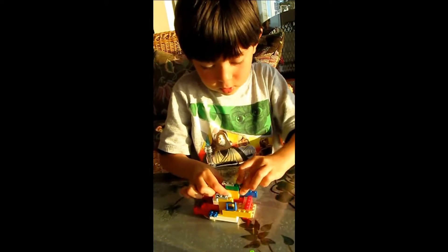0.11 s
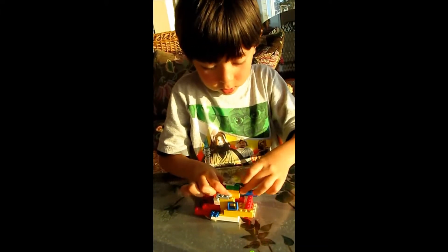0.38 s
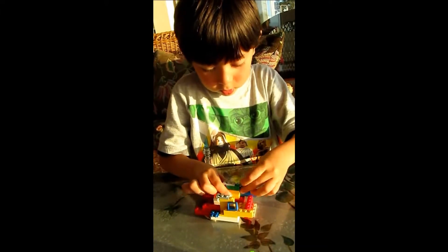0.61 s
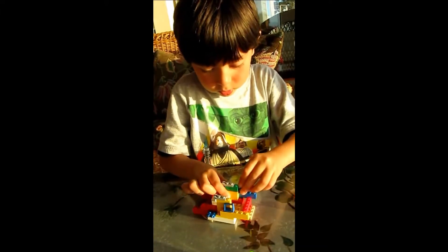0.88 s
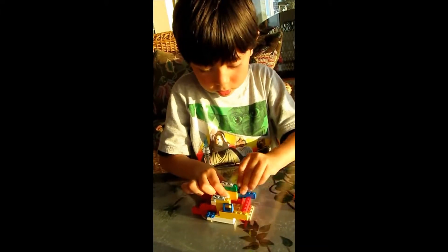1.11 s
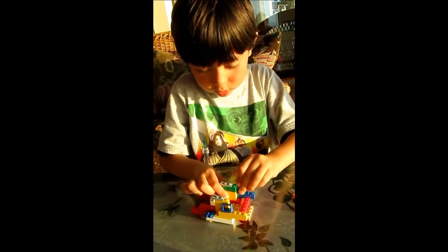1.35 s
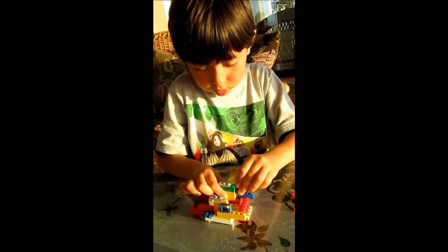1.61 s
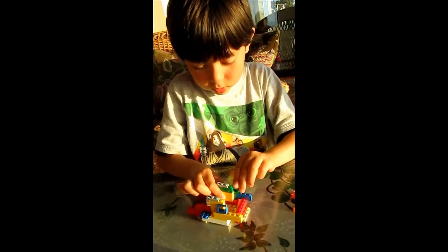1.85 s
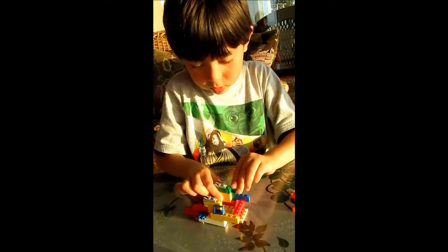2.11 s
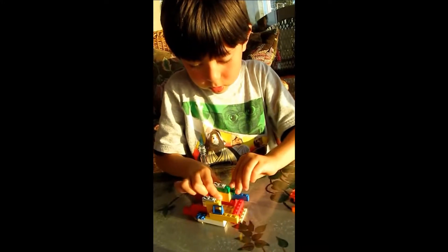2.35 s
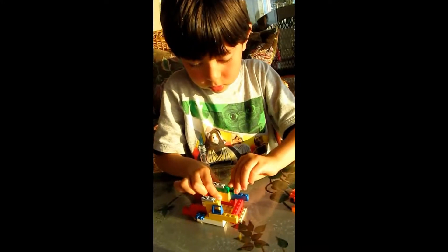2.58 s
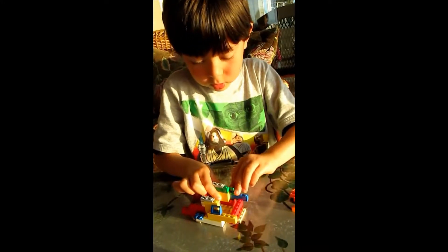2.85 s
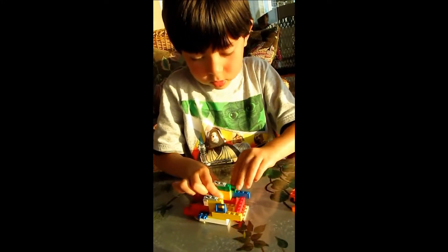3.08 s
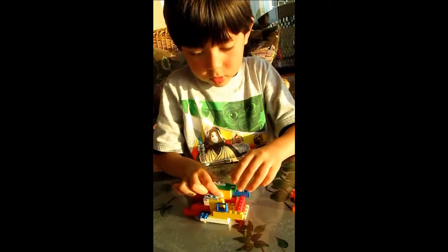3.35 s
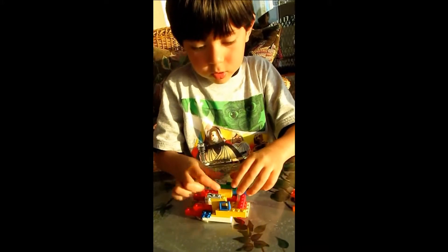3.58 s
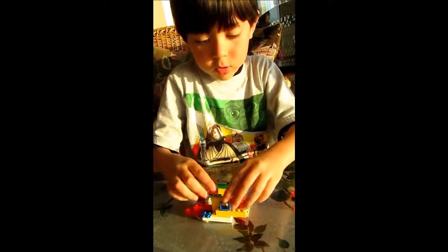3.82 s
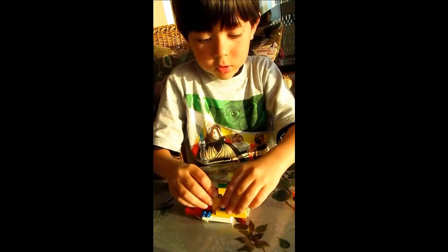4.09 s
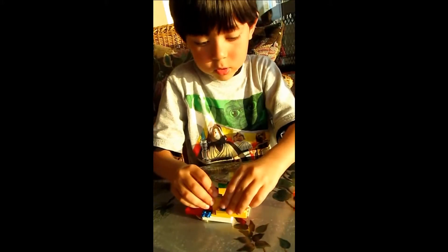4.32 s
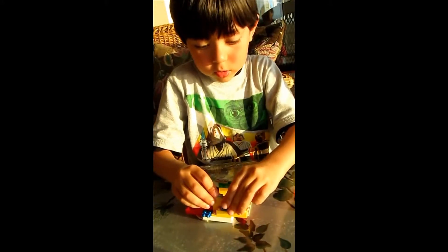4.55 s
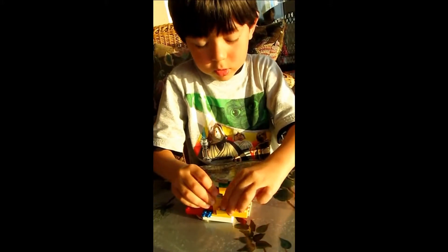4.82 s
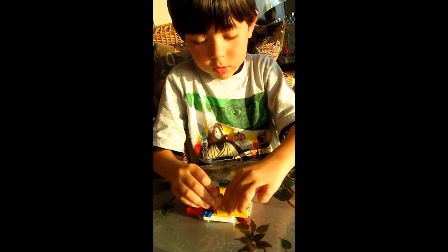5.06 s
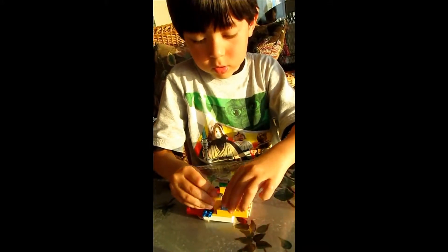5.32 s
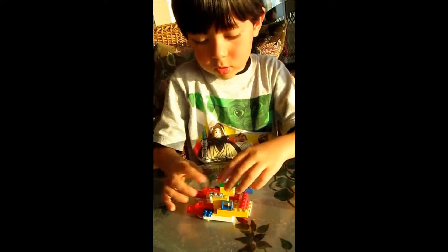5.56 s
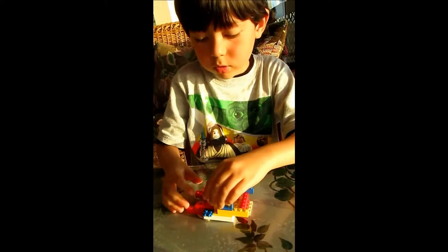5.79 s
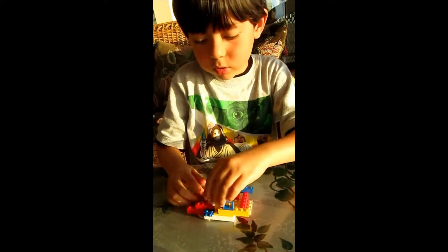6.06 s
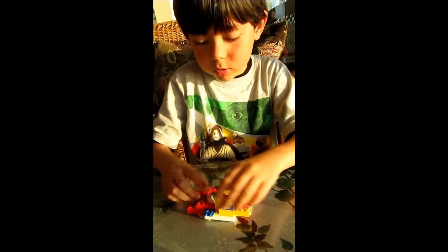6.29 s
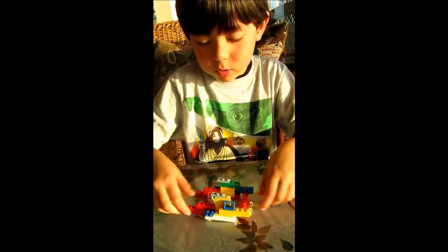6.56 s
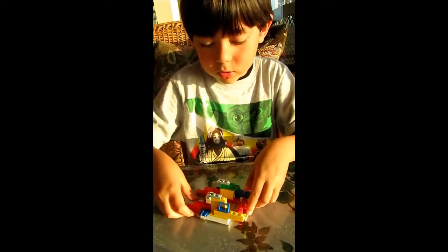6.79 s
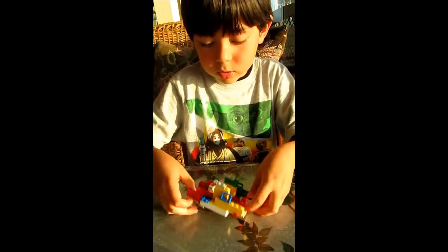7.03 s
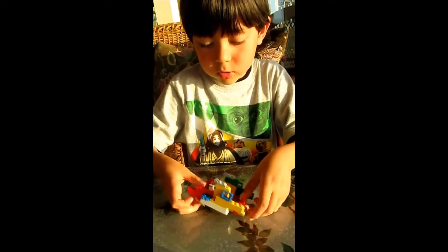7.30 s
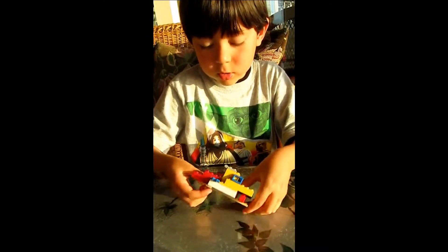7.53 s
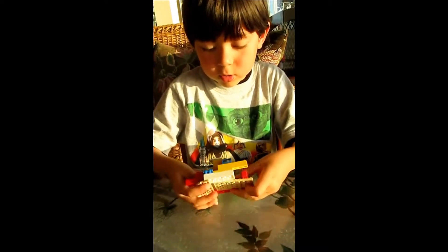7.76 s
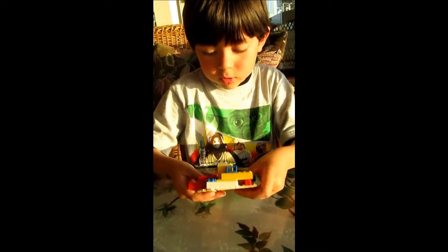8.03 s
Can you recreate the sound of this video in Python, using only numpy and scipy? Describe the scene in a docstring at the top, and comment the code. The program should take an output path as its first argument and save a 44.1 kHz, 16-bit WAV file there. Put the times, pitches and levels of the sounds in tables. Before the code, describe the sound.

Plastic toy bricks are tapped and shuffled on a hard table, one snaps loudly, then the model is knocked about in a quiet room.

```python
"""Quiet room noise and a faint scrape come first, then toy bricks tapped and shifted on a hard table.
Place: a small furnished room. Distance: direct sound above the short room tail, leaning slightly left.
Contacts and dragging ring six bodies, from table top to brick studs, as decaying modes; one snaps loudly.
Low pushes come through the furniture; the noise is shaped bands of stereo hiss.
Microphone: a stereo pair whose gain control ducks the room noise and lets it creep back."""
import sys
import numpy as np
from scipy import signal
from scipy.io import wavfile
from scipy.ndimage import uniform_filter1d

SR = 44100
rng = np.random.default_rng(int(sys.argv[2]) if len(sys.argv) > 2 else 0)


def nominal_scale(level):
    """Amplitude ratio for a level in decibels (scalar or array-like)."""
    x = np.asarray(level, float) / 20
    return 10 ** x


def output_pcm(signal):
    """Save a mono or channel-first signal as 16-bit PCM at the path in sys.argv[1].

    Samples are clipped to [-1, 1] before scaling.
    """
    pcm = np.clip(np.atleast_2d(signal).T, -1, 1) * 32767
    wavfile.write(sys.argv[1], SR, np.round(pcm).astype(np.int16))


N = 359407

# Room noise spectrum. Each row: frequency in Hz, relative density in dB per Hz.
ROOM_NOISE = [(18, -48.5), (30, -17.5), (75, -14), (196, 1), (432, -9), (2690, -20.5), (3530, -21),
              (3990, -38.5), (4410, -23.5), (5370, -25), (7230, -28.5), (8380, -43), (11000, -65.5),
              (14300, -92), (22000, -120)]
# Left-right likeness of the room noise. Each row: frequency in Hz, correlation (1 = same, -1 = opposite).
LIKENESS = [(60, -0.41), (220, -0.61), (820, -0.47), (3030, 0.089), (11200, -0.012)]
# Heavier pushes that reach the microphone through the furniture.
# Each row: start in seconds, level in dB (the push peaks about 11 dB above it).
THUMPS = [(1.577, -52), (2.9495, -43), (6.777, -57), (6.8, -51.5), (7.265, -53), (7.47, -54)]
# Modes of the six bodies. Each row: frequency in Hz, relative level in dB, 60 dB decay time in seconds.
TABLE_TOP = [(111, -31.5, 0.036), (149.7, 1, 0.11), (188, -8, 0.31), (258, 5.5, 0.076), (306.8, -7, 0.39),
             (367, 3, 0.049)]
STACK = [(407, -17, 0.0056), (580, 0, 0.02), (654, -6.5, 0.044), (765, -7.5, 0.024)]
HOLLOWS = [(820, -23.5, 0.0041), (977, 3, 0.021), (990, 4.5, 0.0023), (1084, -1, 0.015), (1165, 2, 0.02),
           (1304, 3, 0.015), (1408, -6, 0.015)]
SIDES = [(1410, -15.5, 0.0088), (1407, -3.5, 0.012), (1583, -1.5, 0.011), (1850, -2, 0.0097),
         (2107, 3.5, 0.004), (2003, -4, 0.014)]
WALLS = [(2320, -14, 0.003), (2350, -3.5, 0.011), (2650, -2, .012), (3104, 0.5, 0.0098), (3296, 0, 0.008),
         (3670, -1.5, 0.0073), (3660, -5.5, 0.014), (4300, -1, 0.0036)]
STUDS = [(4800, 11.5, 0.00047), (5100, 1, 0.0043), (6360, -2.5, 0.0009), (7010, 5.5, 0.0016),
         (7940, -10.5, 0.011), (8800, -5, 0.0038), (10260, -18.5, 0.0068)]
# Hands and model dragging on the table.
# Each row: time in seconds, level in dB, brick scrape in dB relative to that level.
DRAG = [(0, -52.5, -11), (0.45, -76, -10), (0.8, -53.5, -10.5), (1.4, -61.5, -25), (2.05, -53.5, -28),
        (2.649, -66.5, -4), (3.15, -53, -10), (3.45, -84.5, -32), (3.7, -55, -8), (4.199, -52, -12.5),
        (4.7, -67, -23), (5.4, -67, -13), (5.62, -49.5, -11.5), (5.801, -56, -6), (5.92, -48, -17),
        (6.15, -59, -10), (6.6, -58.5, -7), (7.0, -56.5, -13), (7.25, -45.5, -15), (7.419, -49.5, -6),
        (7.8, -59.5, 0.5), (7.998, -56, -7.5)]
# Short taps. Each row: start in seconds, then nominal levels in dB of table top, stacked model,
# brick hollows, thin walls, stud tick.
TAPS = [(0.392, -46, -48, -50, -58, -75), (0.43, -44.5, -82, -85, -84, -54),
        (0.634, -38, -50, -49, -53, -53), (0.6473, -58, -57, -49, -50, -73),
        (0.671, -46.5, -50, -51.5, -58, -81), (0.756, -59, -60, -57, -51.5, -73),
        (0.778, -40, -43, -40, -46, -48), (1.286, -38.5, -48, -51.5, -56.5, -51),
        (1.584, -38, -43, -46, -53.5, -61), (1.736, -52, -54, -50, -65, -85),
        (1.756, -42.5, -47, -55, -61, -49.5), (2.3993, -48, -60, -71, -74.0, -61.5),
        (2.664, -50, -54.5, -58.5, -72, -66), (2.8725, -47.5, -56, -45.5, -53.5, -59.5),
        (3.635, -45, -52.5, -61, -70.5, -76), (3.7205, -43, -47, -56.5, -79.5, -66),
        (3.859, -74, -51, -51, -47.5, -49.5), (4.1007, -34.5, -32, -41.5, -57, -82),
        (4.165, -47, -58, -60, -53, -52.5), (4.178, -53, -67, -62, -54, -66),
        (4.9636, -45, -41, -48.5, -73, -89.5), (5.472, -48.5, -53, -64.5, -65, -68),
        (5.664, -31.5, -29, -44, -54, -51), (5.671, -36, -51, -39, -53, -56),
        (5.682, -38, -41, -45, -61, -54), (5.697, -46, -42, -49.5, -62, -58),
        (5.718, -55, -56, -64, -68, -59), (5.856, -45.5, -61, -61, -71, -64.5),
        (5.8898, -41, -66.0, -80, -74, -61.5), (5.905, -42, -43.5, -58.5, -69, -71),
        (5.9194, -36, -35.5, -44, -69, -63), (5.9775, -36, -43, -45.5, -60.5, -61),
        (6.091, -39.5, -44, -58, -62, -68), (6.211, -41.5, -53.0, -57, -68, -68),
        (6.357, -44.5, -56, -69.5, -62, -55), (6.736, -37, -48, -55, -61, -68.5),
        (6.776, -28.5, -32, -43, -46, -44), (6.789, -29, -44, -31.5, -44, -47),
        (6.803, -30, -37, -35, -43, -40), (6.809, -35, -36, -32.5, -43, -46),
        (6.8148, -30, -43, -29, -47, -55), (6.822, -47, -34, -43, -57, -71),
        (6.832, -46, -34, -45, -51, -72), (6.848, -55, -43, -54, -56, -72),
        (6.9291, -43, -56, -54, -70, -63), (6.942, -37, -38.5, -51.5, -54.5, -69),
        (7.156, -39.5, -58, -83, -67, -74), (7.2, -43, -47, -61, -58, -59),
        (7.239, -41, -44.5, -54, -50, -59), (7.2945, -26, -29, -36.5, -38, -51),
        (7.305, -36.5, -38, -33, -43, -59), (7.318, -50, -44, -35, -44, -59),
        (7.334, -36, -49, -44, -50, -55), (7.35, -38, -45, -40, -59, -70), (7.364, -51, -51, -52, -52, -66),
        (7.476, -26.5, -24, -33.5, -47, -42), (7.637, -42.5, -43, -55, -50.5, -51),
        (7.762, -74, -52, -46, -47, -53.5)]
# Shoves that rattle on longer. Each row: start in seconds, then nominal levels in dB of table top,
# stacked model, brick hollows, thin walls, stud tick, then rattle length in seconds.
SHOVES = [(0.205,-55,-48,-48,-48,-47,0.0058), (0.887,-56,-42,-49,-44.5,-88,0.0082),
          (0.949,-41.5,-61,-54,-57,-88,0.026), (1.999,-44.5,-56,-72,-88,-90,0.021),
          (2.044,-45.5,-62,-55.5,-66,-60,0.027), (4.0677,-31,-36,-47,-49.5,-53,0.018),
          (5.647,-29.5,-45,-47,-58,-58,0.02), (5.784,-53,-48.5,-51,-56.5,-57,0.045),
          (7.224,-33,-40,-63,-61,-62,0.016), (7.262,-46,-50,-46,-58,-56,0.006),
          (7.268,-37.5,-32,-24,-38,-39.5,0.02), (7.273,-24,-23,-38.5,-31,-28.5,0.015),
          (7.284,-36,-28,-29,-33,-31.5,0.01), (7.887,-63,-45,-46,-44.5,-38.5,0.05),
          (8.136,-76,-50,-55,-44,-46,0.005)]
# Clean hard contacts, the loudest a brick snapping home. Each row: start in seconds, then nominal levels
# in dB of table top, stacked model, brick hollows, long sides, thin walls, stud tick.
SNAPS = [(0.2055,-54,-56,-43.5,-60,-50,-47), (0.633,-47,-50,-42,-64,-57,-59),
         (0.7736,-37.5,-40.5,-36,-55,-41,-43), (0.7846,-52,-43,-44,-60,-39.5,-60),
         (1.5783,-41,-37.5,-39,-51,-46,-48), (1.7335,-62,-47,-45,-61,-54.5,-75),
         (0.8868,-41.5,-50,-41,-59,-54,-87), (1.755,-48,-63,-48.5,-53,-66,-60),
         (2.9513,-28,-20.5,-17,-16,-21.5,-31.5), (4.064,-35.5,-52,-44.5,-68,-67,-64.5),
         (4.9629,-54.5,-49,-49,-56,-66.5,-85.5), (6.7748,-30,-46,-60.5,-42.5,-49.5,-51),
         (6.7889,-37,-33,-34.5,-49,-55,-56), (6.816,-38,-33.5,-42,-36,-44,-59),
         (7.2702,-21.5,-26,-25.5,-30,-44,-55), (7.288,-23,-23,-28.5,-35,-29.5,-33),
         (7.4717,-28,-30,-33.5,-40.5,-49,-44), (8.137,-78,-63,-58,-48,-66,-34.5)]
# The next three hold one value each for table, stack, hollows, sides, walls, studs.
# How far heavy bodies start to move before the plastic cracks. Each entry: lead in seconds.
LEAD_S = [0.003, 0.0018, 0.0011, 0.00055, 0.00024, 0.00013]
# Stereo place of the direct sound. Each entry: left over right in dB.
LEFT_LEAN_DB = [0.5, 1.2, 1.1, 1.2, 1.3, .3]
# How well each body radiates into the room. Each entry: send in dB.
ROOM_SEND_DB = [-5.5, -5, -5, -2.5, -6.5, 1.5]

ROOM_NOISE_DB = -53.5   # rms of the two channels' mean, ahead of the gain control
ROOM_T60_S, WALL_CUT_HZ, ROOM_DB, ROOM_WIDTH = 0.38, 2200, -7.5, 0.3   # decay time is that of the lows
# In taps and shoves the long sides ring at a level between hollows and walls, plus an offset.
SIDES_TOWARD_WALLS, TAP_SIDES_DB, SHOVE_SIDES_DB = 0.22, -8, -1.5
TAP_RATTLE_S, SNAP_RATTLE_S = 0.007, 0.0005
CREEP_SHARE = 0.69   # time scale of the knocks before a contact, relative to those after
CLEAN_S = 0.0044   # rattle length holding half the energy
# Unevenness of the knocks, fade per rattle length, likeness between bodies.
SLIP_SPREAD_DB, SLIP_FADE_DB, SLIPS_SHARED = 3.5, 5.5, 0.6
EDGE_ECHO_S, EDGE_ECHO_DB, THUMP_LEAN_DB = 0.0012, -15.5, 4.0   # lean: left over right
DUCK_ABOVE_DB, DUCK_DB_PER_DB, DUCK_ATTACK_S, DUCK_RELEASE_DB_S = -18, 1.6522, 0.14, 3


def rms_one(x):
    """Scale to rms 1."""
    return x / np.sqrt(np.mean(x ** 2) + 1e-20)


def at_hz(points, hz):
    """Read a table on a log-frequency axis."""
    table_hz, values = np.transpose(points)
    return np.interp(np.log(hz), np.log(table_hz), values)


def drift(corner_hz):
    """Slow chance with spread 1: noise through two equal low-pass poles, at one fortieth of the rate."""
    r = np.exp(-2 * np.pi * corner_hz * 40 / SR)
    white = rng.standard_normal(N // 40 + 2002)
    slow = signal.lfilter([1], [1, -2 * r, r * r], white)[2000:]   # drop the filter's run-in
    return np.interp(np.arange(N) / 40, np.arange(len(slow)), rms_one(slow))


def room_noise(flicker_db=2.0):
    """Third-octave bands of wide stereo noise, each with a slight flicker of its own."""
    out, edges = 0, 25 * 2 ** np.arange(0, 9, 1 / 3)
    white = rng.standard_normal((2, 2, N))
    for k, (low, high) in enumerate(zip(edges, edges[1:])):
        band = signal.butter(2, [low, high], "band", fs=SR, output="sos")
        mid, side = signal.sosfilt(band, white[k % 2])   # neighbouring bands use separate noise
        hz = np.sqrt(low * high)
        alike = np.clip(at_hz(LIKENESS, hz), -.95, .95)
        width = np.sqrt((1 - alike) / (1 + alike))
        gain = nominal_scale(at_hz(ROOM_NOISE, hz) + flicker_db * drift(28))
        out = out + gain * (mid + width * side * [[1], [-1]])
    # nothing steady in the top octave
    out = signal.sosfilt(signal.butter(12, 7800, fs=SR, output="sos"), out)
    return nominal_scale(ROOM_NOISE_DB) * out / np.std(out.mean(axis=0))


def room(x):
    """Two dying noise responses, duller with time: a strong shared one and a weak left-right difference."""
    t = np.arange(SR // 2) / SR
    white = rng.standard_normal((2, len(t))) * (1 - np.exp(-t / 0.00073))   # first echoes build up
    low = signal.lfilter(*signal.butter(2, WALL_CUT_HZ, fs=SR), white)
    low_tails = low * nominal_scale(-60 * t / ROOM_T60_S)
    high_tails = nominal_scale(-2.5) * (white - low) * nominal_scale(-110 * t / ROOM_T60_S)
    tails = low_tails + high_tails
    tails = tails / np.sqrt(np.sum(tails ** 2, axis=1, keepdims=True))
    mid, side = signal.fftconvolve(x[None], tails)[:, :N]
    return nominal_scale(ROOM_DB) * (mid + ROOM_WIDTH * side * [[1], [-1]])


def thumps(rise_s=0.0043):
    """A soft low push through the furniture that swings back once."""
    s, level_db = np.transpose(THUMPS)
    t = np.arange(SR // 10) / SR / rise_s
    push = t * (2 - t) * np.exp(1 - t)
    hits = np.bincount((s * SR).astype(int), nominal_scale(level_db + 9.0), N)
    return signal.fftconvolve(hits, push)[:N]


def body(modes, at, sizes, scatter_db):
    """Clicks ring decaying modes, their strengths varying per click; a unit click nears rms 1 over 20 ms."""
    out, energy = np.zeros(N), 0
    for k, (hz, level_db, t60) in enumerate(modes):
        r, w = nominal_scale(-60 / (t60 * SR)), 2 * np.pi * hz / SR
        mode_db = level_db + scatter_db * rng.standard_normal(len(at))
        strength = (-1) ** k * sizes * nominal_scale(mode_db)
        clicks = np.bincount(at, strength, N)[:N]
        out += signal.lfilter([0, np.sin(w)], [1, -2 * r * np.cos(w), r * r], clicks + 1e-18)
        energy += nominal_scale(2 * level_db) / (2 * (1 - r * r))
    # contact is soft above the top mode and a small body radiates little below its lowest
    edges = [0.98 * modes[0][0], 1.334 * modes[-1][0]]
    out = signal.sosfilt(signal.butter(2, edges, "band", fs=SR, output="sos"), out)
    return out * np.sqrt(SR / 50 / energy)


def dragging(per_s=600):
    """Dense uneven catches shake the table top and the model; the bricks' scrape comes and goes on top."""
    chance = per_s * nominal_scale(4 * drift(12)) / SR
    at = np.flatnonzero(rng.random(N) < chance)
    sizes = nominal_scale(4.5 * np.minimum(rng.exponential(1, len(at)), 3))
    sizes = sizes * rng.choice([-1, 1], len(at))
    s, level_db, scrape_db = np.transpose(DRAG)
    t = np.arange(N) / SR
    level_db, scrape_db = np.interp(t, s, level_db), np.interp(t, s, scrape_db)
    shares_db = [(TABLE_TOP, -1.0), (STACK, -8), (HOLLOWS, scrape_db), (SIDES, scrape_db - 4.0),
                 (WALLS, scrape_db - 6), (STUDS, scrape_db - 14.5)]
    return [nominal_scale(level_db + db) * rms_one(body(modes, at, sizes, 4.0)) for modes, db in shares_db]


def touches(count=110):
    """A contact within a rattle of uneven knocks; the longer the rattle, the more of the energy it holds."""
    soft = np.transpose(TAPS + [row[:-1] for row in SHOVES])
    s, table_db, stack_db, hollows_db, walls_db, studs_db = soft
    offset_db = np.repeat([TAP_SIDES_DB, SHOVE_SIDES_DB], [len(TAPS), len(SHOVES)])
    sides_db = hollows_db + SIDES_TOWARD_WALLS * (walls_db - hollows_db) + offset_db
    soft = [s, table_db, stack_db, hollows_db, sides_db, walls_db, studs_db]
    s, *levels_db = np.hstack([soft, np.transpose(SNAPS)])

    shove_rattles = [row[-1] for row in SHOVES]
    rattle_s = [TAP_RATTLE_S] * len(TAPS) + shove_rattles + [SNAP_RATTLE_S] * len(SNAPS)
    rattle_s = np.array(rattle_s)[:, None]
    share = rattle_s ** 2 / (rattle_s ** 2 + CLEAN_S ** 2)   # energy held by the rattle
    delay = rng.random((len(s), count)) * 2.3 - .5   # in rattle lengths; some creep comes before the contact
    delay_s = delay * np.where(delay < 0, CREEP_SHARE * rattle_s, rattle_s)
    at = np.hstack([s[:, None], s[:, None] + delay_s]).ravel()

    uneven_db = SLIP_SPREAD_DB * np.minimum(rng.exponential(1, delay.shape), 3)
    fade_db = np.minimum(-SLIP_FADE_DB * delay, 30 * delay)   # swells before the contact, fades after
    force = nominal_scale(uneven_db + fade_db)
    common, alike = rng.standard_normal(delay.shape), np.clip(SLIPS_SHARED, 0, 1)
    scatter_db = np.repeat(3 * share, count + 1)
    out = []
    bodies = [TABLE_TOP, STACK, HOLLOWS, SIDES, WALLS, STUDS]
    for modes, db, lead_s in zip(bodies, levels_db, LEAD_S):
        own = rng.standard_normal(delay.shape)
        slips = force * (alike * common + np.sqrt(1 - alike ** 2) * own)
        slips = slips * np.sqrt(share / np.sum(slips ** 2, axis=1, keepdims=True))
        sizes = (nominal_scale(db)[:, None] * np.hstack([np.sqrt(1 - share), slips])).ravel()
        samples = np.clip((at - lead_s) * SR, 0, N - 1).astype(int)
        out.append(body(modes, samples, sizes, scatter_db))
    return out


def scene():
    """Touches and dragging ring the same six bodies, slightly left, in the room."""
    bodies = [hit + drag for hit, drag in zip(touches(), dragging())]
    direct = sum(x * nominal_scale([[db / 2], [-db / 2]]) for x, db in zip(bodies, LEFT_LEAN_DB))
    # a near echo reaches the two microphones in opposite sense
    echo = np.interp(np.arange(N) - EDGE_ECHO_S * SR, np.arange(N), direct.mean(axis=0))
    echo = nominal_scale(EDGE_ECHO_DB) * echo * [[1], [-1]]
    push = thumps() * nominal_scale([[THUMP_LEAN_DB / 2], [-THUMP_LEAN_DB / 2]])
    return direct + echo + room(nominal_scale(ROOM_SEND_DB) @ bodies) + push + room_noise()


def band_limit(x):
    """A steep low-pass at the top of the band."""
    return signal.sosfilt(signal.butter(12, 11800, fs=SR, output="sos"), x)


def record(dry):
    """Gain control: loud peaks pull the gain down, it returns slowly; microphone dip, rounded peaks, top cut."""
    t = np.arange(N) / SR
    level_db = 10 * np.log10(uniform_filter1d(np.mean(dry ** 2, axis=0), size=96) + 1e-12)
    over_db = DUCK_DB_PER_DB * np.maximum(level_db - DUCK_ABOVE_DB, 0)
    # hold each peak's reduction and let it fall at a steady rate
    held_db = np.maximum.accumulate(over_db + DUCK_RELEASE_DB_S * t) - DUCK_RELEASE_DB_S * t
    r = np.exp(-1 / (DUCK_ATTACK_S * SR))
    ducked = dry * nominal_scale(-signal.lfilter([1 - r], [1, -r], held_db))
    notch = signal.iirnotch(4050, 5, SR)   # the microphone housing has a dip near 4 kHz
    rounded = np.tanh(signal.lfilter(*notch, ducked))
    top_cut = signal.cheby2(10, 50, 11300, fs=SR, output="sos")
    mix = signal.sosfilt(top_cut, rounded)
    return band_limit(mix)


dry = scene()
out = record(dry)
output_pcm(out)
```